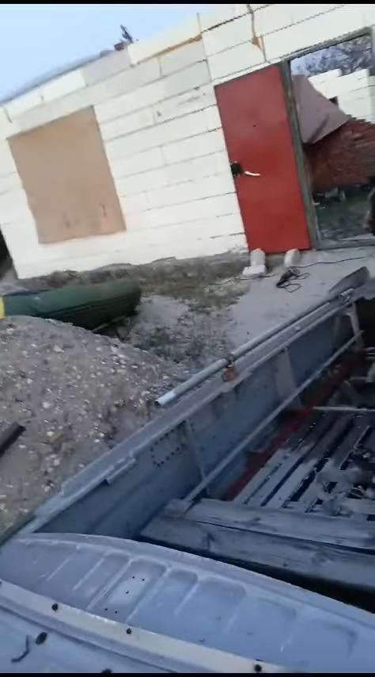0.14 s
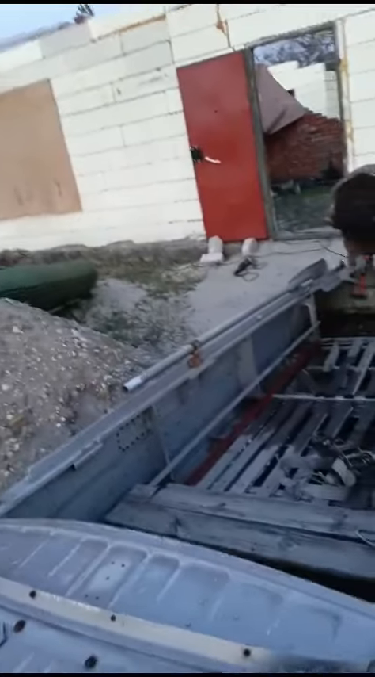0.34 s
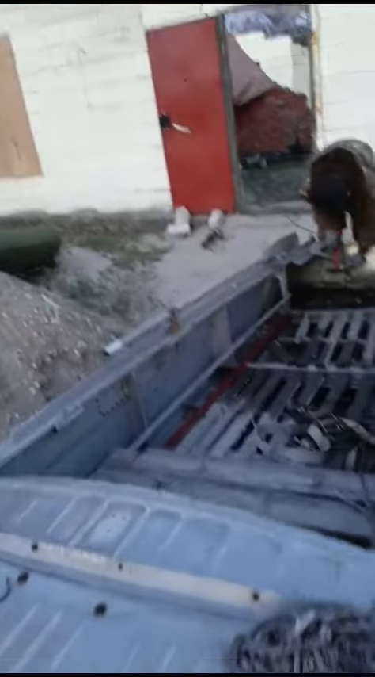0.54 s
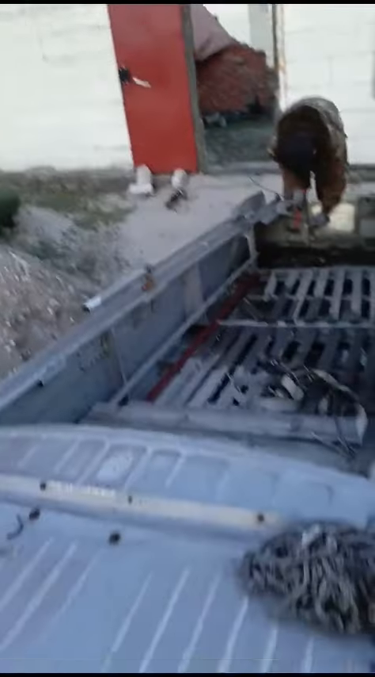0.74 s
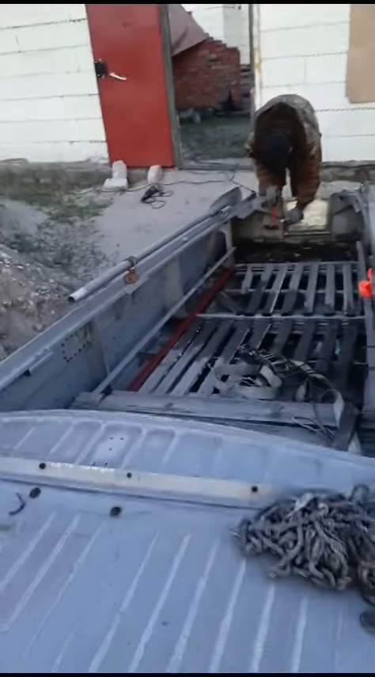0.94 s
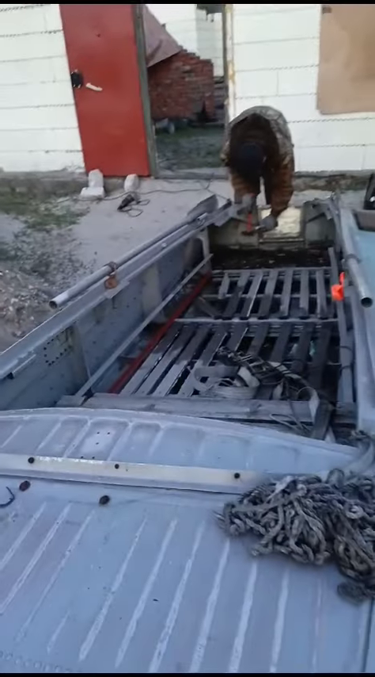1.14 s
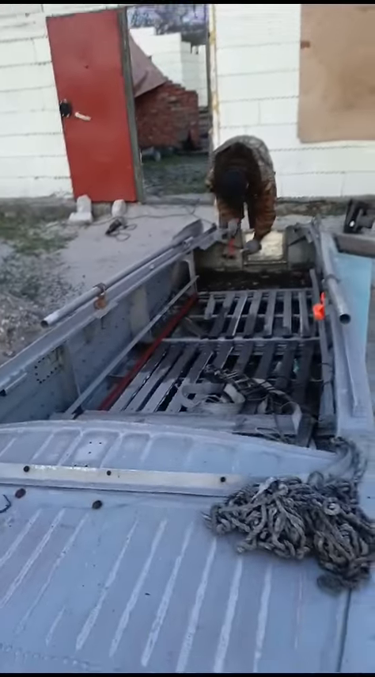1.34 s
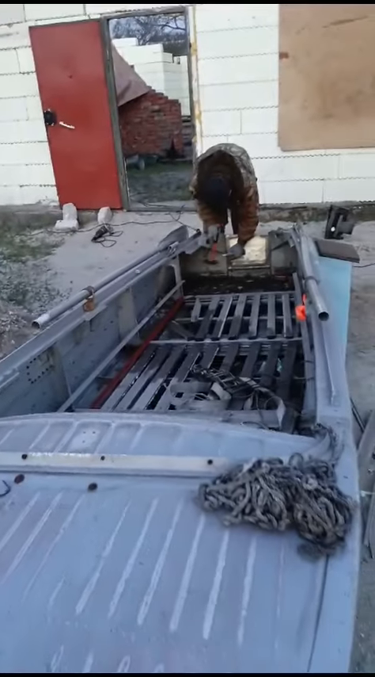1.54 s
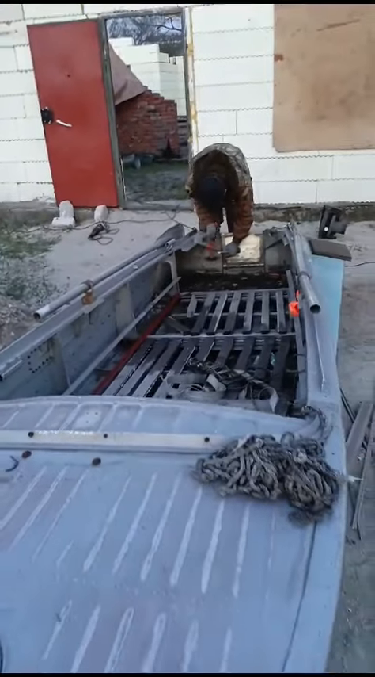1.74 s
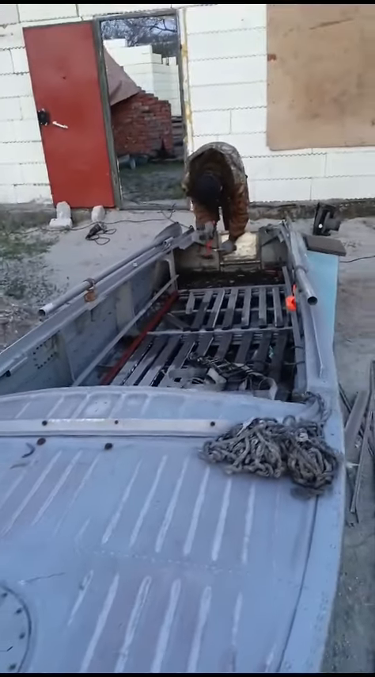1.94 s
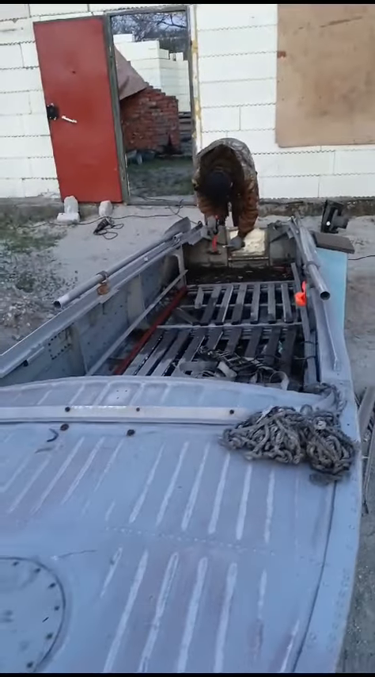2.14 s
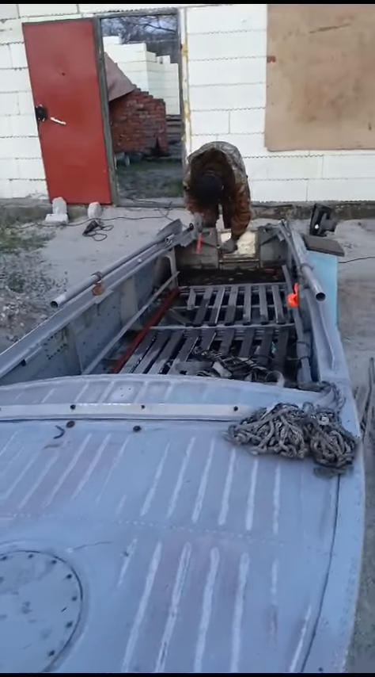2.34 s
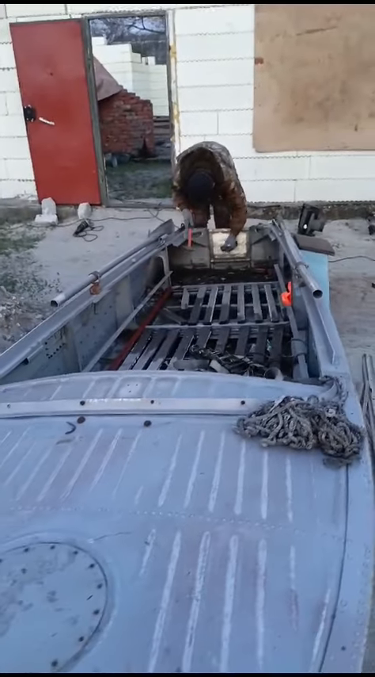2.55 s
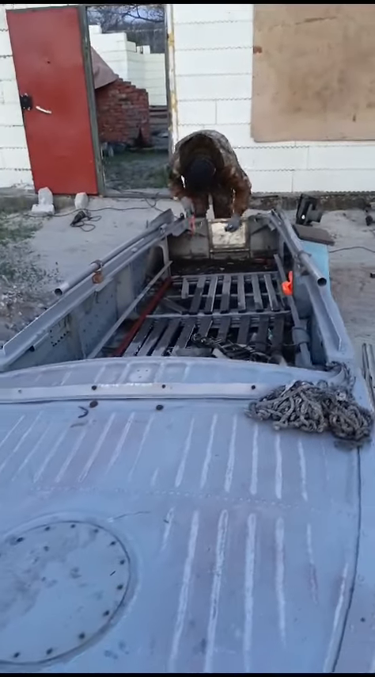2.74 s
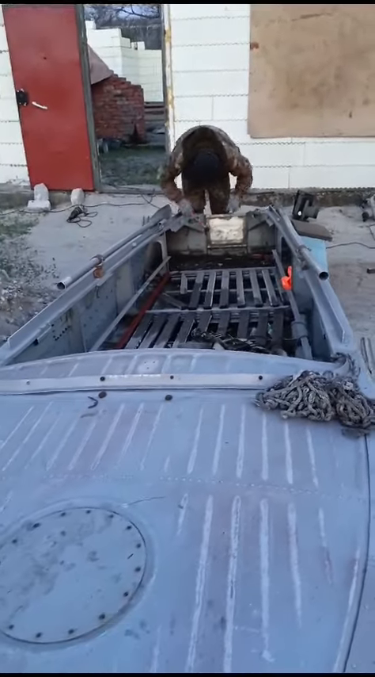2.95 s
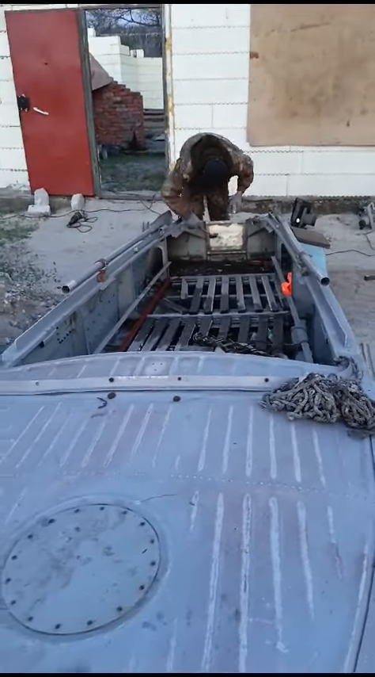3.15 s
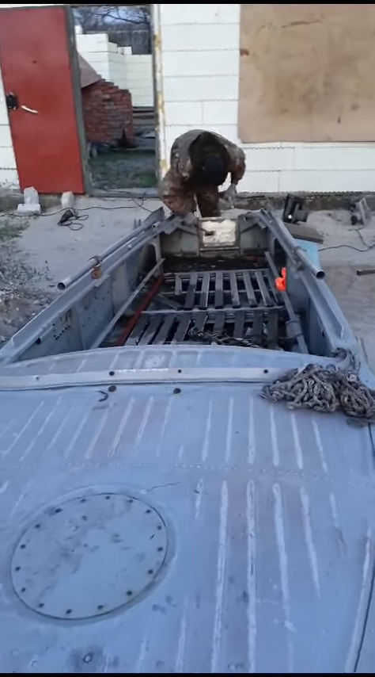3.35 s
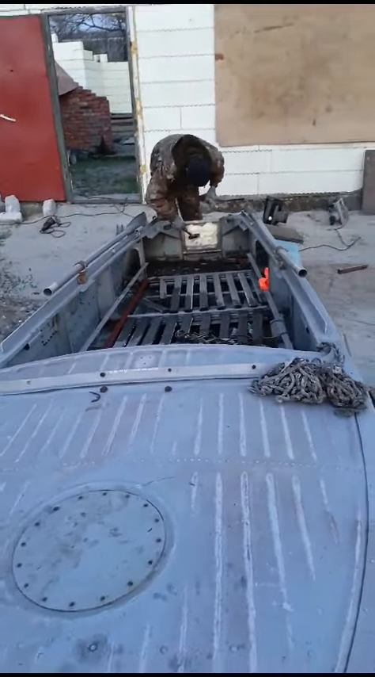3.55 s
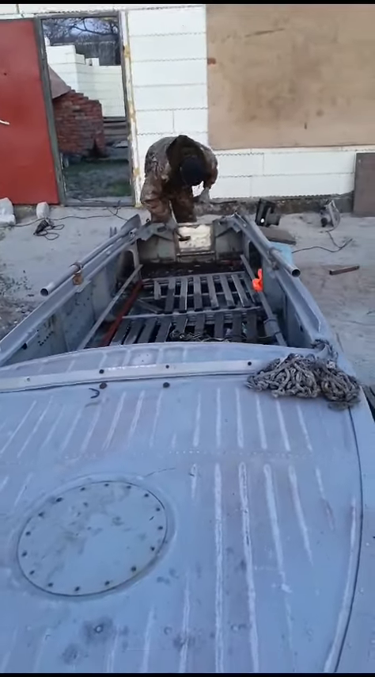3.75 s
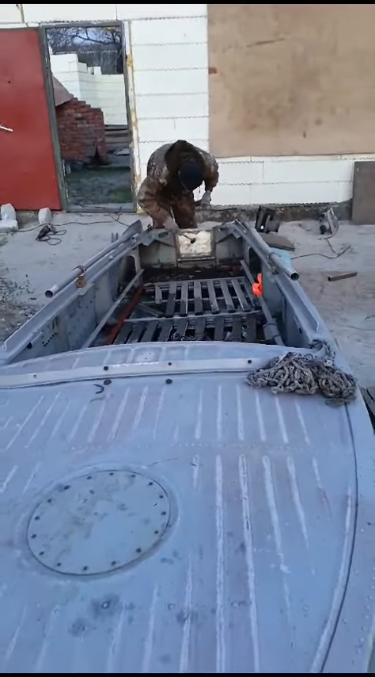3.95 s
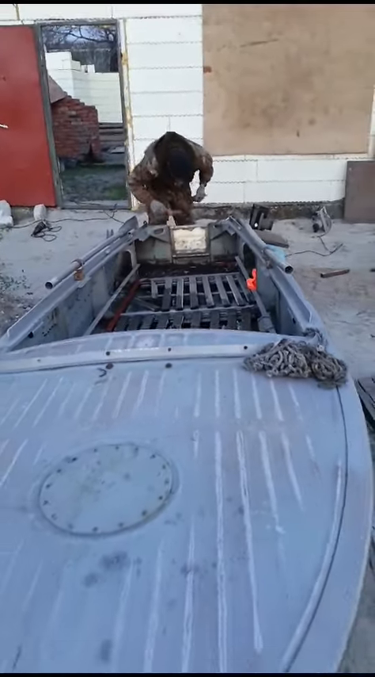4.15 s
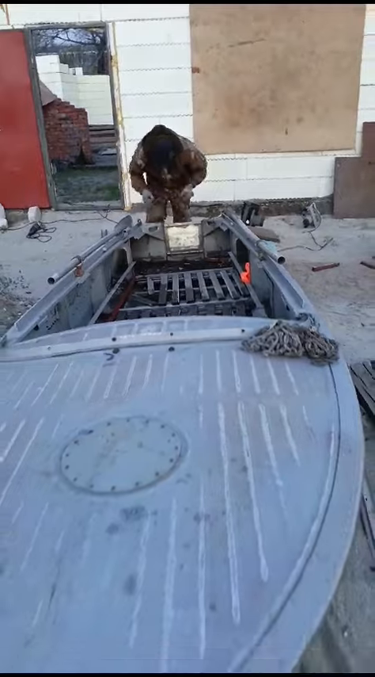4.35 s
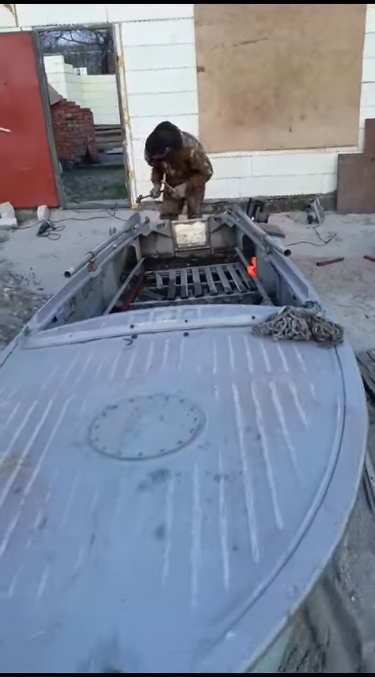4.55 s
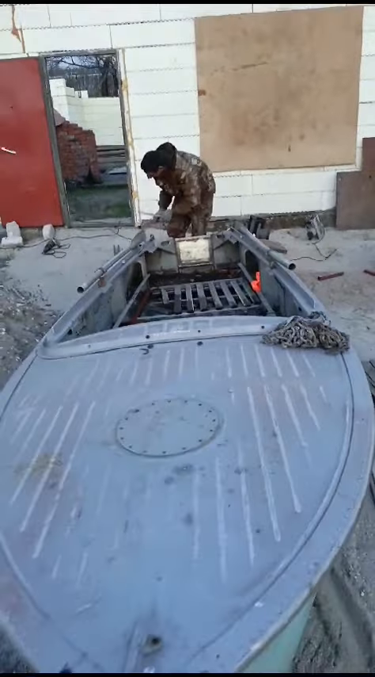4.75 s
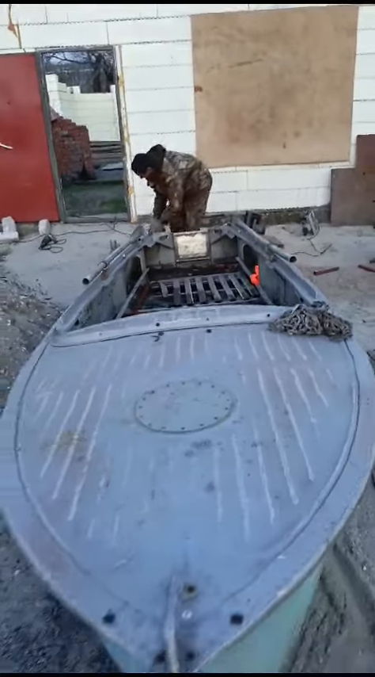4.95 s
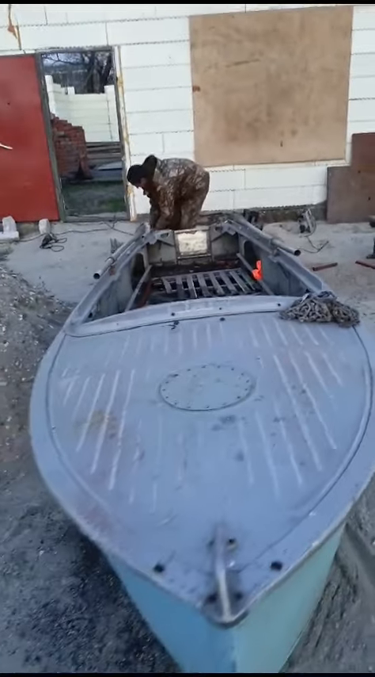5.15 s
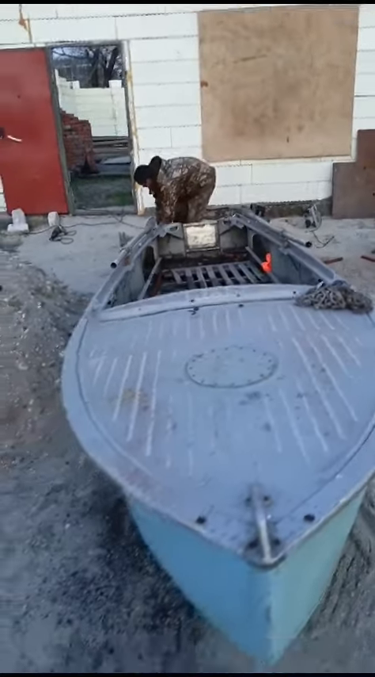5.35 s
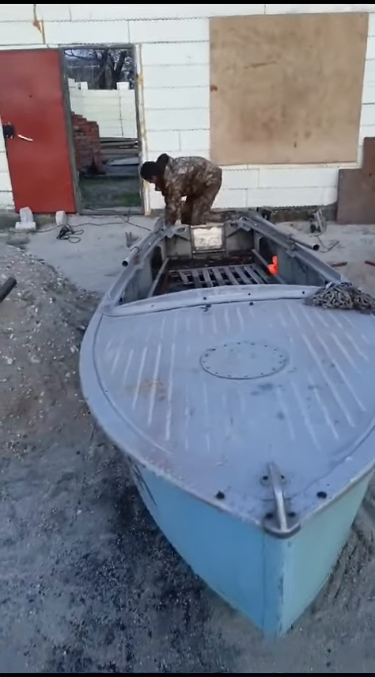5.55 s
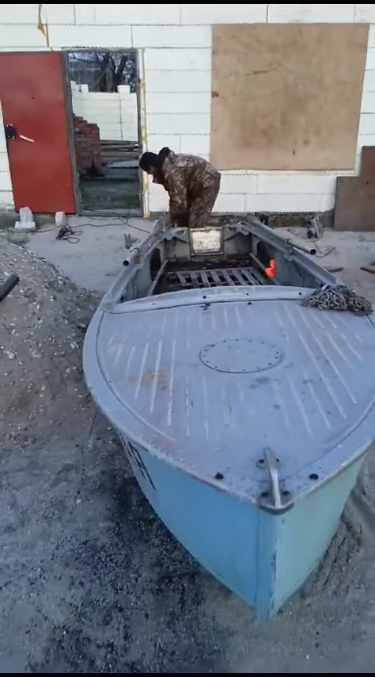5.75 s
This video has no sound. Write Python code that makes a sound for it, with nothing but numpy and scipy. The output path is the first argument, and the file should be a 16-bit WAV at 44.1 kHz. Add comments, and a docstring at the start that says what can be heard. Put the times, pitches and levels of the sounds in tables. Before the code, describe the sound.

Loud clanging hammer strikes on a hollow metal hull echo off nearby walls, pause briefly, resume twice, and fade into small metallic clinks.

```python
"""A hammer strikes a sheet-metal boat in a walled yard. The wash of an earlier blow opens the scene, then come
a run of seven blows, a pause with a faint scrape, two more blows and, over their wash, light metal taps.
Blows are dying sines (hull, plate) plus banded noise (crack, wash), thrown back by walls; meanwhile the
listener walks from the side of the boat towards its bow. Throughout, filtered noise gives distant traffic,
a far hum and rustling clothes near the small microphone."""
import sys
import numpy as np
from scipy import signal
from scipy.fft import rfft, irfft, next_fast_len
from scipy.io import wavfile
from scipy.ndimage import uniform_filter1d

SR = 44100
rng = np.random.default_rng(int(sys.argv[2]) if len(sys.argv) > 2 else 0)


def wav_out(sig):
    """Save sig, one row per channel (or a flat mono array), as 16-bit PCM at SR to the path in sys.argv[1]."""
    wavfile.write(sys.argv[1], SR, np.round(np.clip(np.atleast_2d(sig).T, -1, 1) * 32767).astype(np.int16))


N = 255339

LENGTH = 36000  # samples per blow
DAMP_S = 0.11  # shaken plates buckle and rub: the first ring has lost an extra 60 dB by then, ever faster


def hammer():
    """Every blow, its swelling forerunner through the metal, its wall returns and the hammer's rebounds."""
    # blows: start_s, thump_db, clang_db, crack_db, wash_db (all relative),
    # wash tilt below 500 Hz and above 1 kHz: deep_db_per_octave, treble_db_per_octave
    blows = [(-.25, -24.5, -1.5, -9, -3, 2, 4.5), (.261, 4.5, 0.5, -3.5, -2.8, 1, -6),
             (0.555, 6.5, -0.5, 1, 2, 2, -1.5), (0.884, 6.5, 1.5, 5, 3, 0.9, -2.5),
             (1.197, 6, 2, 2.5, 2.5, 0, -1.5), (1.494, 5.5, 0.7, -0.5, 1.9, 1.1, -1),
             (1.797, 6, -0.5, 2.6, 3, -1.2, 0), (2.081, 5.5, -3, 2.1, 2.8, 1.2, -3),
             (3.521, 7.5, -1.7, 0.6, 3, 0.3, -2), (3.8, 7.5, -0.5, 1.2, 2.2, 2.6, -1)]
    # listener's path: time_s, place (0 side, 1 quarter, 2 bow)
    walk = [(0, 0.019), (.9, 0.47), (2.1, 0.77), (3.5, 1.48)]
    # walls, re blow: delay_s, bass_side_db, bass_bow_db, treble_side_db, treble_bow_db
    walls = [(.069, -9, -11, -44, -18.5), (.113, -7.5, -3, -39, -22.5), (.19, -12.5, -14, -46.5, -40)]
    # hammer bounces and lands again, re blow: start_s, bass_db, treble_db
    rebounds = [(.282, -8, -6.5), (1.287, -3, -41.5), (1.883, -7, -21), (2.129, -12, -18.5),
                (3.94, -8.5, -27.5)]
    lead_s, lead_db = 0.0089, -10  # sound in the metal outruns sound in air

    out, dense = np.zeros(N), sheet()
    t = np.arange(LENGTH // 4) / SR
    swell = np.linspace(0, 1, round(lead_s * SR)) ** 0.52
    brief = amp(-60 * t / 0.34) * (1 - np.exp(-t / 0.003)) * (1 - t / t[-1])
    for (s, *colour), (next_s, *_) in zip(blows, blows[1:] + [(np.inf,)]):
        place = np.interp(s, *np.transpose(walk))
        sound = amp(-2.5) * blow(dense, place, *colour)
        dull = signal.lfilter(*signal.butter(1, 5000., fs=SR), sound[:len(t)])
        bass = signal.lfilter(*signal.butter(2, 700., fs=SR), dull)
        treble = dull - bass
        # rough brick and clutter scatter the treble
        smear = rng.standard_normal(len(t)) * amp(-60 * t / .09)
        smear = smear / np.linalg.norm(smear)
        scattered = treble + 0.84 * signal.fftconvolve(treble, smear)[:len(t)]

        add(out, s, sound)
        forerunner = (.6 * dull + 1.2 * bass)[300:][:len(swell)]
        add(out, s - lead_s, amp(lead_db) * swell * forerunner)
        returns = [(s + delay_s, low + (low_bow - low) * place / 2, high + (high_bow - high) * place / 2)
                   for delay_s, low, low_bow, high, high_bow in walls]
        returns += [row for row in rebounds if s < row[0] < next_s]
        for at_s, bass_db, treble_db in returns:
            add(out, at_s, brief * (amp(bass_db) * bass + amp(treble_db) * scattered))
    return out


def blow(dense, place, thump_db, clang_db, crack_db, wash_db, deep_db, tilt_db):
    """Hull thump, plate clang, crack, and a wash whose treble flutters as loose parts rattle."""
    # hull modes: freq_hz, side_db, quarter_db, bow_db, t60_s (before extra damping)
    hull_modes = [(113.36, -26, -20.5, -17, 0.1), (152, -27.5, -26.5, -7, .35),
                  (125.5, -18, -13.5, -15, 0.73), (173.5, -22, -25.5, -6, 0.9), (206, -19, -13, -22, 1),
                  (268.3, -18.5, -15.5, -35, 0.14), (285.7, -19, -13, -40.5, 0.17),
                  (324.7, -5, -26, -24.5, 0.17), (372.8, -13, -25, -24, 0.11),
                  (393, -16.5, -34.5, -14, 0.16), (544.4, -19, -22.5, -37, 0.22),
                  (702.4, -31, -30.5, -25, 0.18), (909, -29, -27.5, -30, 0.14),
                  (1077, -30.5, -39, -17.5, 0.18), (1154, -38, -27.5, -41.5, 0.36)]
    # struck plate modes: freq_hz, side_db, quarter_db, bow_db, t60_s (before extra damping)
    plate_modes = [(1287, -17.5, -38, -33, 0.33), (1493, -16, -29.5, -37, 0.051),
                   (1664, -19, -22.5, -43, 0.12), (1868, -11.5, -16.5, -41.5, 0.085),
                   (1860, -19, -19, -20, 0.23), (1964, -18, -21.5, -22.5, 0.35),
                   (2106, -24.5, -19.5, -22.5, 0.7), (2192, -23, -6.5, -17, 0.18),
                   (2360, -28.5, -5.5, -21.5, 0.077), (2980, -38.5, -27.5, -27, 0.19),
                   (3510, -37.5, -30.5, -2, 0.046), (3840, -21, -26, -11, 0.12),
                   (4140, -43, -41, -13.5, 0.14), (5296, -41.5, -24.5, -48.5, 0.062),
                   (6500, -39, -31, -25, .06)]

    hz, share, crack, wash = dense
    # clusters of modes, faded in from 520 to 1820 Hz
    lumps = evened(uniform_filter1d(rng.standard_normal(share.shape[1]), size=90))
    bin_hz = np.arange(len(lumps)) * SR / LENGTH
    lumps = lumps * np.clip(bin_hz / 1300.0 - .4, 0, 1)
    bands = irfft(rfft(rng.standard_normal(LENGTH)) * share * amp(1.8 * lumps), LENGTH)

    # the crack grows brighter as the hammer comes into line of sight
    crack_gain = amp(crack_db + 3.6 * place * (hz > 12000)) * crack

    depth = np.log2(np.maximum(500 / hz, 1))  # octaves below 500 Hz
    octaves = np.log2(np.maximum(hz / 1000., 1))  # above 1 kHz
    # the foredeck shades the low middle
    hollow_db = -2.1 * place * np.exp(-(np.log2(hz / 260) / .4) ** 2)
    flutter = wander(LENGTH, size=350) + 0.29 * wander(bands.shape, size=600)
    wash_gain = amp(wash_db + hollow_db + deep_db * depth + tilt_db * octaves) * wash
    wash_gain = wash_gain * np.abs(1 + 0.18 * octaves * flutter)

    noise = (bands * (crack_gain + wash_gain)).sum(0)
    thump = ring(hull_modes, place, rough=0.052, linger_db=-14.5, cycles=0.96, spread=.3,
                 size=LENGTH * 3 // 4)
    clang = ring(plate_modes, place, rough=1.0, linger_db=-40.5, cycles=1.4, spread=1, size=LENGTH // 3)
    return noise + amp(thump_db) * thump + amp(clang_db) * clang


def ring(modes, place, rough, linger_db, cycles, spread, size):
    """Dying sines struck together, weighted by where one listens and, a little, by where the blow lands."""
    linger = 3.5  # a small part of each mode has this many times the t60
    hz, side, quarter, bow, t60 = np.transpose(modes)[:, :, None]
    db = side + (quarter - side) * np.clip(place, 0, 1) + (bow - quarter) * np.clip(place - 1, 0, 1)
    t = np.arange(size) / SR
    fade = amp(-60 * t / t60 - 60 * (t / DAMP_S) ** 2)
    fade = fade + amp(linger_db - 60 * t / (linger * t60)) * (1 - t / t[-1])
    weight, phase = rng.standard_normal(hz.shape), rng.random(hz.shape)
    tones = amp(db + 0.5 * weight) * fade * np.sin(2 * np.pi * (hz * t + spread * phase))
    beats = 1 + rough * wander(tones.shape, size=170)  # close pairs beat
    swell = 1 - np.exp(-t * hz / cycles)
    return np.pad((tones * beats * swell).sum(0), (0, LENGTH - size))


def sheet():
    """Band shapes and the two decays of the dense modes: a quick crack and a wash that builds up."""
    # small modes by band: freq_hz, crack_db, crack_t60_s (before extra damping), crack_rise_s,
    # wash_db, wash_t60_s, wash_rise_s
    sheet_bands = [(43.63, -54.5, .2, .01, -39.5, 0.62, 0.26), (71.5, -43.5, .2, .005, -23, 0.9, 0.85),
                   (122, -22, .2, 0.0045, -14.5, 1, 0.21), (178.2, -20, 0.15, 0.0027, -12.5, 1, 0.44),
                   (242, -19.5, 0.2, 0.0078, -10.5, 0.74, 0.19), (336, -21, 0.15, .004, -8.5, 0.66, 0.17),
                   (472, -33, 0.059, 0.0024, -16, 0.54, 0.12), (740, -21.5, 0.12, 0.002, -20, 0.44, 0.056),
                   (1180, -24, 0.19, 0.013, -32, 0.76, .04), (2210, -14.5, 0.14, 0.0078, -22, 0.41, 0.11),
                   (2880, -22.5, .09, 0.0011, -41.5, 0.39, 0.015),
                   (3920, -20, 0.07, 0.0021, -41.5, 0.38, 0.012),
                   (4850, -21, 0.045, 0.0011, -43, 0.27, 0.009),
                   (6470, -23.5, 0.04, 0.0015, -47, 0.19, 0.0098),
                   (7560, -37, 0.05, 0.00074, -56.5, 0.17, 0.011),
                   (10000, -45, 0.082, 0.0012, -68.5, 0.18, 0.012),
                   (14400, -34, 0.027, 0.00089, -70, .25, .01), (15410, -26.5, 0.044, .001, -73, .25, .01)]
    t = np.arange(LENGTH) / SR
    hz, crack_db, crack_t60, rise, wash_db, wash_t60, build = np.transpose(sheet_bands)[:, :, None]
    bin_hz = np.fft.rfftfreq(LENGTH, 1 / SR)
    position = np.interp(np.log(bin_hz + 1), np.log(hz[:, 0]), np.arange(len(hz)))
    # overlapping bands
    share = np.cos(np.pi / 2 * np.clip(position - np.arange(len(hz))[:, None], -1, 1))
    share = share / np.sqrt(np.mean(share ** 2, 1, keepdims=True))
    tick = 1 + 0.34 * (hz > 3000) * np.exp(-t / 0.0023)  # steel meets steel
    crack = amp(crack_db - 60 * t / crack_t60 - 60 * (t / DAMP_S) ** 2) * (1 - np.exp(-t / rise)) * tick
    wash = amp(wash_db - 60 * t / wash_t60) * (1 - np.exp(-t / build))
    return hz, share, crack, wash


def taps():
    """Light knocks of metal on metal and small ticks: bright noise bursts that leave a thin ring of sines."""
    # knocks: start_s, level_db, burst_t60_s
    knocks = [(4.43, -53.5, 0.09), (4.5596, -39, 0.03), (4.9761, -65, 0.059), (5.5687, -65, 0.059),
              (5.6254, -28, 0.047), (5.631, -29.5, 0.096), (5.642, -34, 0.034)]
    # burst spectrum, relative: freq_hz, density_db_per_hz
    burst_spectrum = [(710, -31), (1200, -34), (1670, 3), (1940, 7.5), (2420, -2), (2980, -7), (3120, -9),
                      (4100, 0), (5760, -15), (7490, -32.5), (13100, -83), (15100, -16), (16500, -45)]
    # thin ring: lowest_freq_hz, level_db (relative), t60_s
    thin_modes = [(1976, -21.5, 0.14), (2880, -2, 0.068), (4380, -9, 0.11), (6050, -14, 0.082)]
    out, t = np.zeros(N), np.arange(16384) / SR
    for s, db, t60 in knocks:
        burst = amp(-60 * t / t60) * coloured(burst_spectrum, len(t))
        thin = np.zeros(len(t))
        for hz, thin_db, thin_t60 in thin_modes:
            detuned_hz = hz * rng.uniform(1.0, 1.01)
            thin += amp(thin_db - 60 * t / thin_t60) * np.sin(2 * np.pi * detuned_hz * t)
        thin *= 0.46 + 0.31 * wander(len(t), size=120)
        add(out, s, amp(db) * (burst + thin) * (1 - np.exp(-t / 0.00059)))
    return out


def rustle():
    """Cloth near the microphone: grainy coloured noise in short strokes over a faint floor."""
    # strokes of cloth: start_s, hold_s, level_db
    cloth_strokes = [(.7, .1, -59.5), (1.13, .015, -63.5), (2.32, 0.022, -67.5), (3.02, 0.026, -69),
                     (3.69, 0.076, -66.5), (4.4, 0.33, -64.5), (4.545, 0.02, -57), (4.81, .02, -67),
                     (4.99, 0.026, -65.5), (5.1, 0.22, -80.5), (5.39, 0.22, -63), (5.705, 0.0093, -56)]
    # cloth spectrum, relative: freq_hz, density_db_per_hz
    cloth_spectrum = [(2400, -46.5), (3000, -11), (4150, -8.5), (5460, -12), (6870, -19), (8200, -30.5),
                      (9500, -15.5), (11900, -14), (14000, -4), (15300, 1.5), (15800, 4), (16100, -29)]
    cloth = coloured(cloth_spectrum, next_fast_len(N))[:N]
    return grain() * (strokes(cloth_strokes) + amp(-90.5)) * cloth


def scrape():
    """Something drags over the ground: grainy resonant noise in strokes of unsteady level."""
    # drags: start_s, hold_s, level_db
    drags = [(2.35, .1, -80), (3.04, 0.1, -88), (4.41, 0.06, -69.5), (4.52, 0.059, -66),
             (4.62, 0.16, -79.5)]
    # resonances: freq_hz, width_hz, level_db (relative)
    resonances = [(3360, 560, 5), (4670, 150, -8), (5720, 370, -8.5), (7950, 500, -14)]
    return grain() * strokes(drags) * fuzzy(resonances) * amp(3.2 * wander(N, size=700))


def traffic():
    """Distant traffic: coloured noise made patchy in time and frequency, under a slow level curve."""
    # spectrum, relative: freq_hz, density_db_per_hz
    spectrum = [(25, -37.5), (45, -27.5), (75, -7), (110, -5), (167, -1), (250, -10), (410, -9), (540, -11),
                (720, -7), (890, -11), (1350, -13), (2000, -21), (2250, -33), (2650, -33.5), (2900, -61)]
    # level curve: time_s, level_db
    level = [(0, -42.5), (2.5, -42), (2.9, -43.5), (3.15, -44), (3.3, -43.5), (4.5, -40.5), (5., -43),
             (5.3, -42.5), (5.79, -41.5)]
    z = signal.stft(coloured(spectrum, next_fast_len(N)), nperseg=1024)[2]
    patches = uniform_filter1d(rng.standard_normal(z.shape), size=7, axis=0)
    patches = evened(uniform_filter1d(patches, size=9))
    wash = signal.istft(z * amp(1.7 * patches), nperseg=1024)[1][:N]
    return amp(curve(level)) * wash


def hum():
    """Some far machine: narrow noise bands whose level wanders together."""
    # bands: freq_hz, width_hz, level_db (mean)
    hum_bands = [(140, 7, -58), (168, 5.5, -75.5), (408.2, 16, -55.5), (589.7, 14, -52.5), (783, 22, -60)]
    return fuzzy(hum_bands) * amp(2.5 * wander(N, size=5000))


def grain():
    """Fast chance gain that breaks noise into grains."""
    return amp(1.3 * evened(uniform_filter1d(rng.standard_normal(N), size=150)))


def strokes(rows):
    """Gain of strokes that swell, hold and fade."""
    rise_db_per_s, fall_db_per_s = 905, 395.5
    start, hold, db = np.transpose(rows)[:, :, None]
    t = np.arange(N) / SR - start
    return amp(db + rise_db_per_s * np.minimum(t, 0) - fall_db_per_s * np.maximum(t - hold, 0)).sum(0)


def fuzzy(lines):
    """Noise in narrow resonances."""
    size = next_fast_len(N)
    hz = np.fft.rfftfreq(size, 1 / SR)
    shape = sum(amp(db) / np.sqrt(width) / (1 + (2 * (hz - f) / width) ** 2) for f, width, db in lines)
    return irfft(rfft(rng.standard_normal(size)) * shape * np.sqrt(2 * SR / np.pi), size)[:N]


def coloured(points, size):
    """Noise of rms 1 with the given spectrum."""
    f, db = np.transpose(points)
    hz = np.fft.rfftfreq(size, 1 / SR)
    gain = amp(np.interp(np.log(hz + 1), np.log(f + 1), db))
    return evened(irfft(rfft(rng.standard_normal(size)) * gain, size))


def wander(shape, size):
    """Smooth chance of rms 1 that changes over about size samples."""
    smooth = uniform_filter1d(rng.standard_normal(shape), size=size)
    return evened(uniform_filter1d(smooth, size=size))


def amp(db):
    """dB to gain."""
    return 10 ** (np.asarray(db) / 20)


def evened(x):
    """Scaled to rms 1 along the last axis."""
    return x / np.sqrt(np.mean(x ** 2, -1, keepdims=True) + 1e-20)


def curve(rows):
    """A control curve, sample by sample."""
    return np.interp(np.arange(N) / SR, *np.transpose(rows))


def add(mix, s, sound):
    """Mixes a sound in at s seconds, cut at both ends of the mix."""
    at = round(s * SR)
    sound = sound[max(-at, 0):]
    part = mix[max(at, 0):][:len(sound)]
    part += sound[:len(part)]


def scene():
    """All sources at one microphone."""
    return (hammer() + taps() + rustle() + scrape() + traffic() + hum())[None]


def record(dry):
    """The small microphone drops the deep bass and overloads softly; then the band limit."""
    held = signal.lfilter(*signal.butter(3, 55., "high", fs=SR), dry)
    held = 1.193 * np.tanh(held / 1.412)
    edge_hz = 16250
    low_pass = signal.firwin(511, edge_hz, window=("kaiser", 9), fs=SR)
    return signal.oaconvolve(held, low_pass[None], "same")


dry = scene()
out = record(dry)
wav_out(out)
```